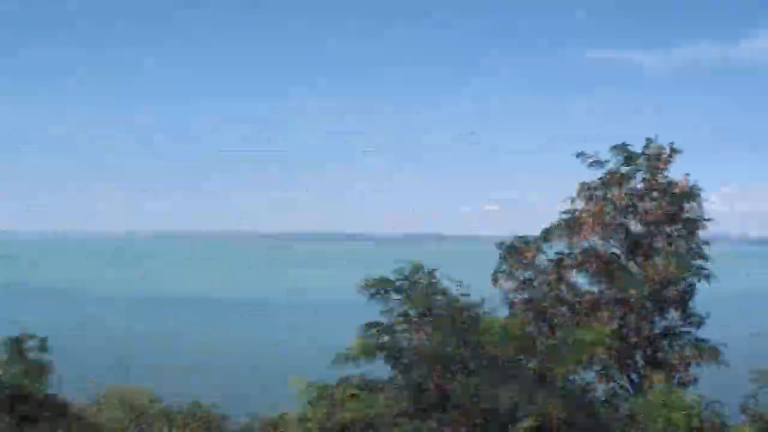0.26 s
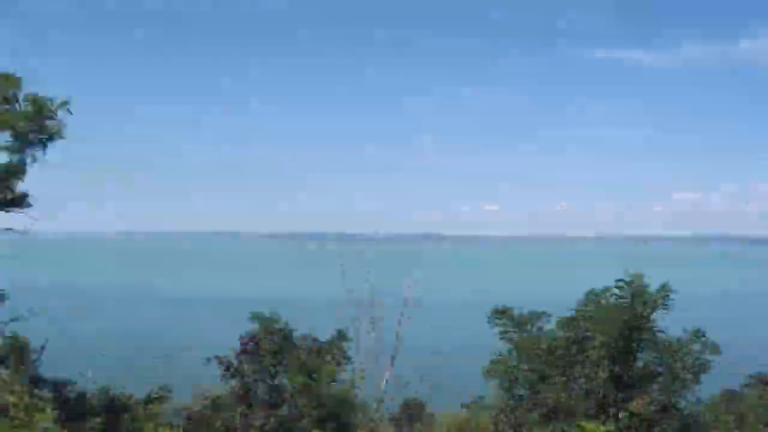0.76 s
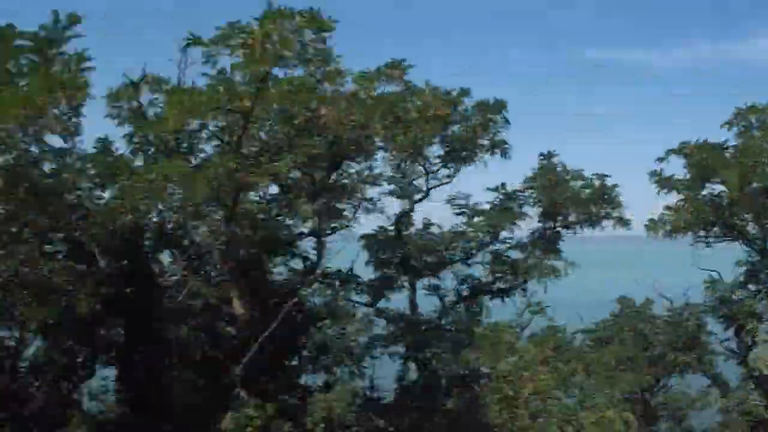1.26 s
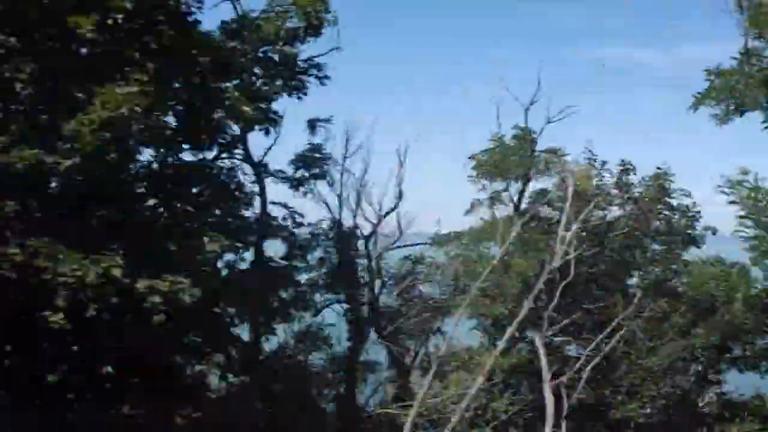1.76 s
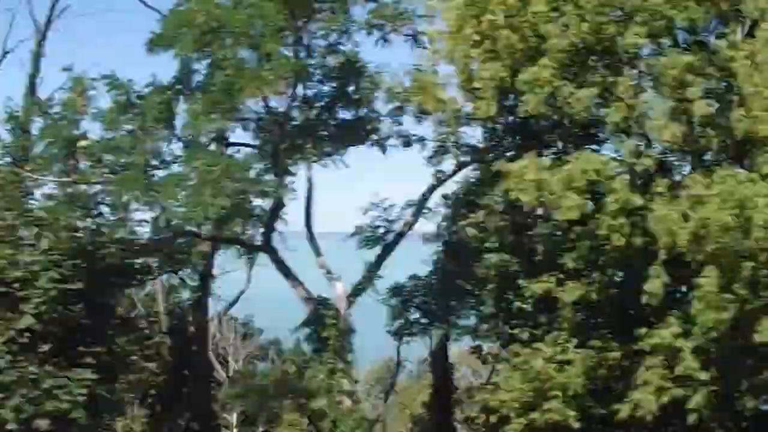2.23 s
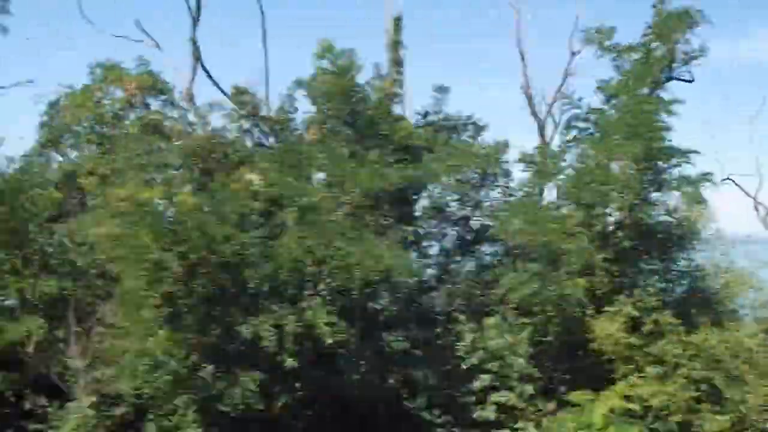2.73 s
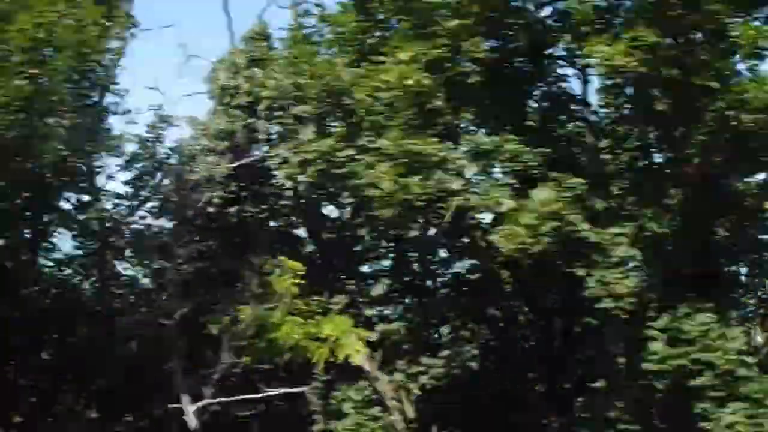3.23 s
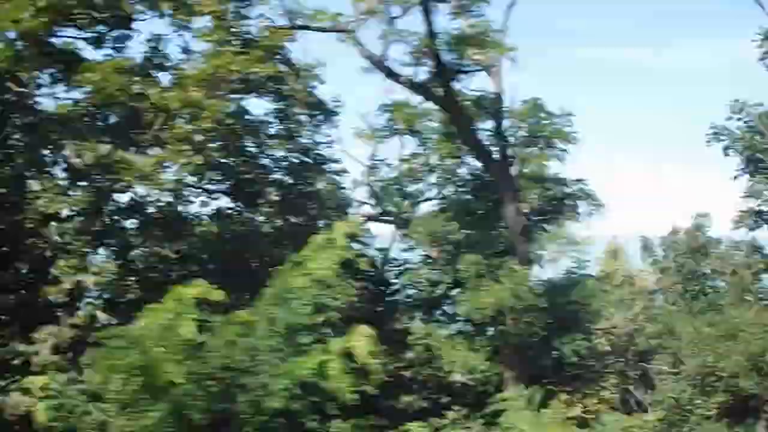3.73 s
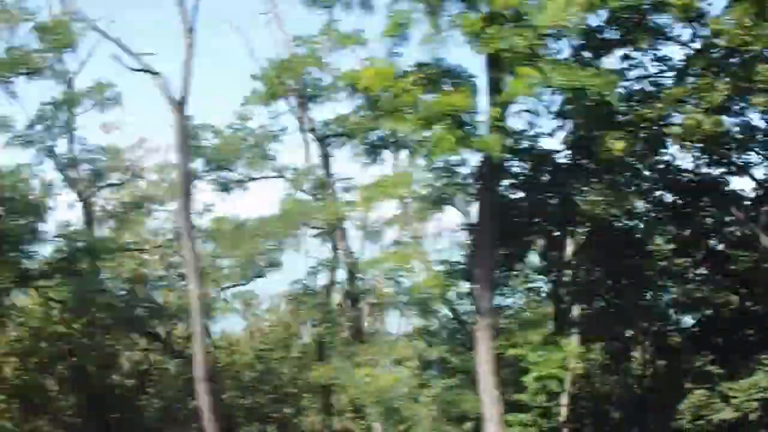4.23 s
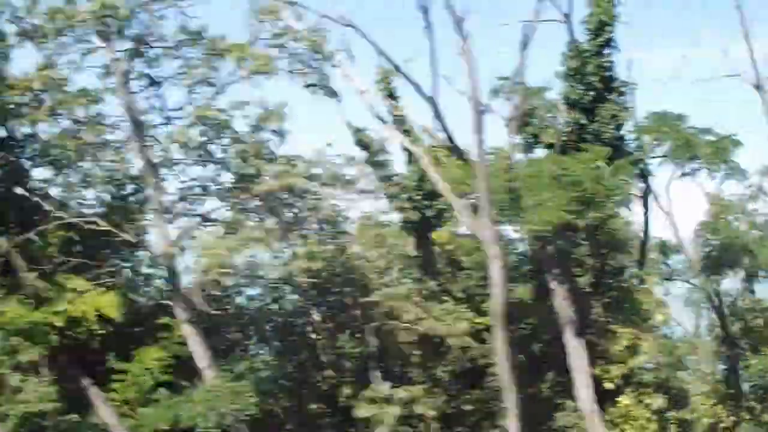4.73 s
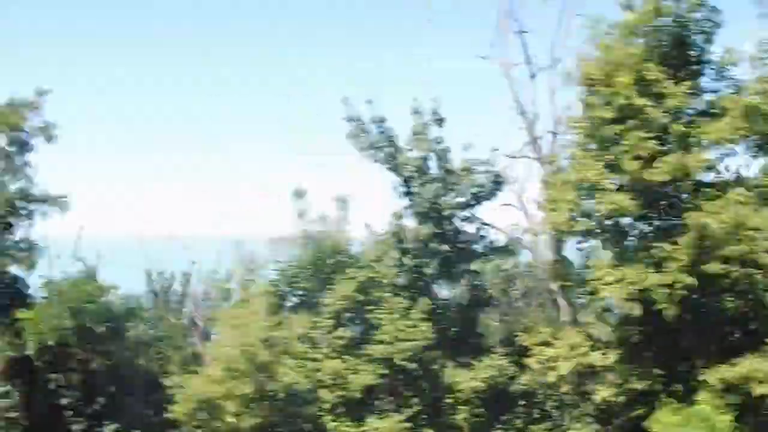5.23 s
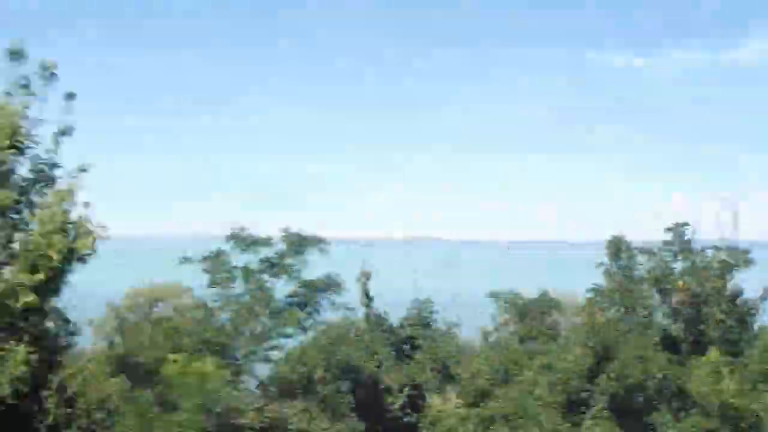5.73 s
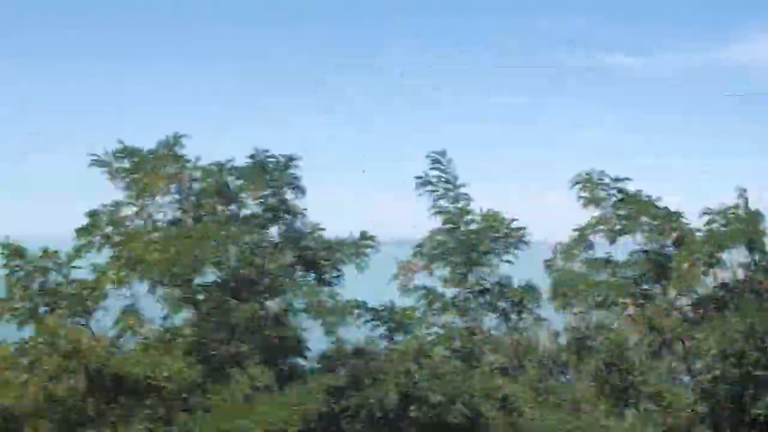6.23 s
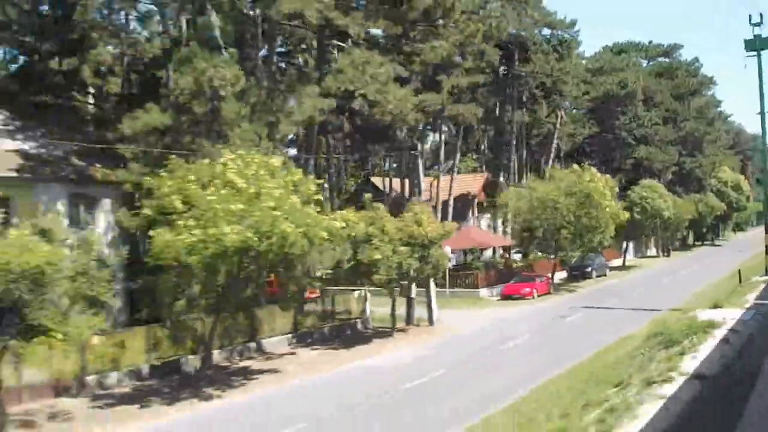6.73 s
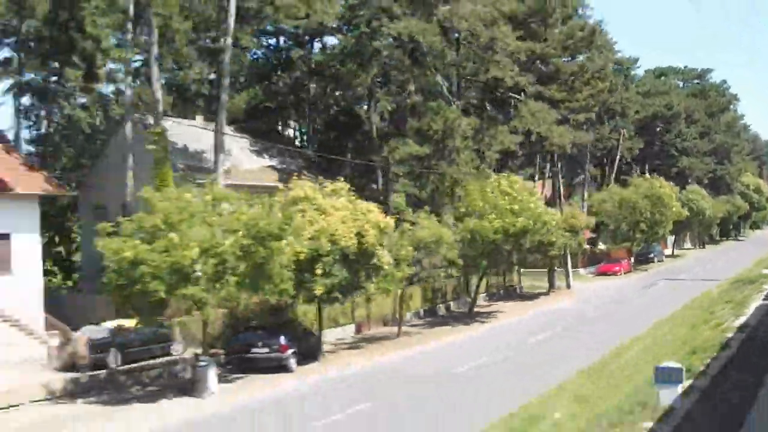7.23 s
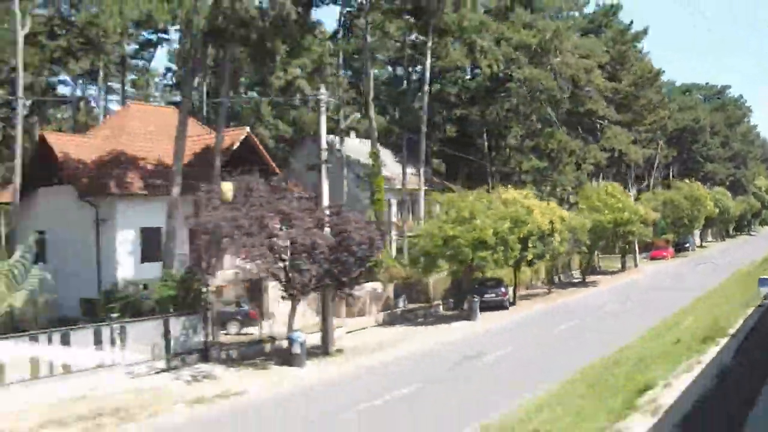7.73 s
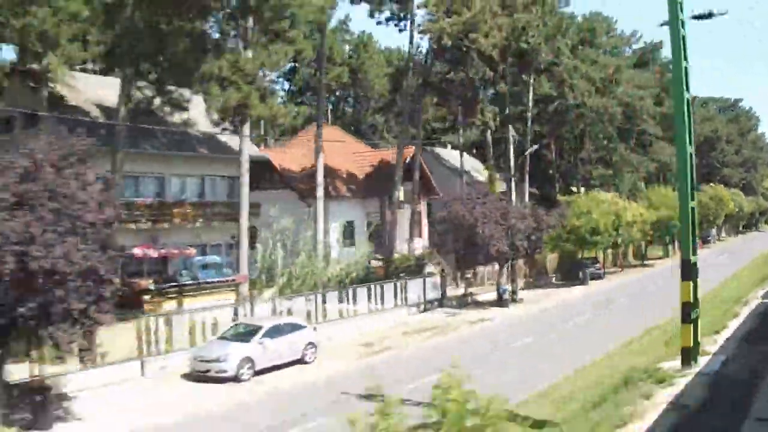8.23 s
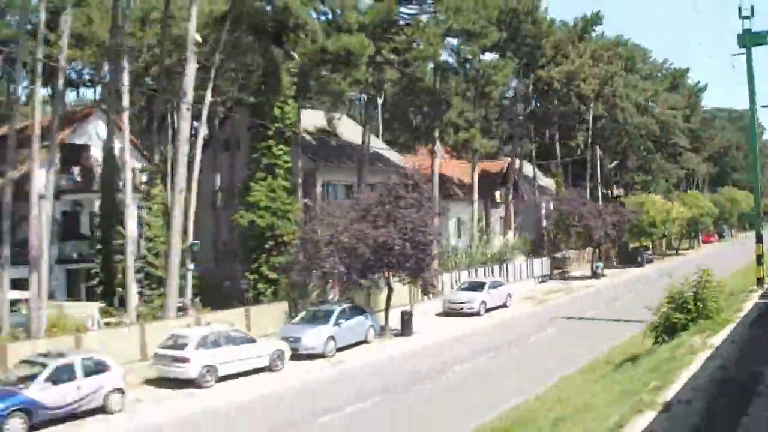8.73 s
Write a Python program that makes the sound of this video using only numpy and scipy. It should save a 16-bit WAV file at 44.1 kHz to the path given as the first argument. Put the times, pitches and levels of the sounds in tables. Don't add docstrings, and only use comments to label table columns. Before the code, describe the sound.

Heavy wind buffets a microphone at an open vehicle window, low overloaded rumble and flutter broken by sharp irregular knocks and brief hissing bursts.

```python
import sys
import numpy as np
from scipy import signal
from scipy.fft import rfft, irfft, next_fast_len
from scipy.io import wavfile
from scipy.ndimage import uniform_filter1d

SR = 44100
rng = np.random.default_rng(int(sys.argv[2]) if len(sys.argv) > 2 else 0)


def master_out(mix):
    frames = np.transpose(np.atleast_2d(mix))
    ceiling = np.clip(frames, -1, 1)
    pcm = np.round(ceiling * 32767).astype(np.int16)
    wavfile.write(sys.argv[1], SR, pcm)


def boost(x):
    u = np.asarray(x, float) / 20
    return 10 ** u


N = 396018

# (time [s], length [s], drive over the ceiling [dB], eddy frequency [Hz], port whistle [dB])
GUSTS = [(0.002, 0.027, -2, 149, -24), (0.124, 0.072, 15.5, 109, -22.5), (0.469, 0.034, 18.5, 145, -12),
         (0.822, 0.026, 28, 189.3, -12.5), (1.418, 0.076, 13.5, 170, -13.5),
         (2.062, 0.051, 33, 186.3, -10.5), (2.557, 0.045, 22, 113, -22.5),
         (2.819, 0.027, 16.5, 82.4, -15.5), (2.962, 0.012, 16.5, 147, -8), (3.004, 0.013, 25.5, 63.5, -23),
         (3.138, 0.048, 30.5, 161.3, -10.5), (3.687, 0.05, 22, 117, -27), (4.004, 0.056, 8, 186, -19.5),
         (4.284, 0.017, 27, 114.7, -7.5), (4.325, 0.045, -3, 180, -20), (4.506, 0.068, 24, 236.2, -7.5),
         (4.85, 0.065, 15, 202, -14.5), (5.389, 0.049, 22.5, 129.4, -11.5), (5.835, 0.056, 27.5, 223, -9),
         (6.652, 0.085, 23, 254, -11), (7.636, 0.042, 24.5, 488, -2.5), (7.994, 0.013, 36, 410, -32),
         (8.081, 0.046, 26.5, 479, -7.5), (8.593, 0.099, 19.5, 267, -17.5), (8.861, 0.047, 26, 380, -5.5)]
# (time [s], length [s], drive over the ceiling [dB], eddy frequency [Hz])
SURGES = [(0.015, 0.042, 1.5, 110), (0.101, 0.05, -1, 58.4), (0.508, 0.042, 8.5, 82),
          (0.575, 0.045, 12.5, 137), (0.6, 0.026, -3, 141), (0.665, 0.01, 11, 128),
          (0.862, 0.013, 13, 38.7), (1.491, 0.068, 6.5, 119), (2.873, 0.0046, 12, 45.7),
          (3.207, 0.013, 14.5, 78), (4.098, 0.0078, 21.5, 35.8), (4.379, 0.031, 22.5, 80.6),
          (4.926, 0.094, -7.5, 110), (4.991, 0.025, 3, 139), (5.049, 0.051, 15.5, 96),
          (5.149, 0.0045, 17, 77.5), (5.499, 0.0051, 23, 92), (5.913, 0.057, 17, 70.7),
          (6.291, 0.078, 20, 92), (6.73, 0.026, -2, 120), (7.685, 0.042, 11.5, 168), (8.01, 0.043, 15, 151),
          (8.138, 0.013, 21, 198), (8.167, 0.031, 7.5, 85), (8.218, 0.043, 0.5, 123),
          (8.265, 0.01, 23, 248), (8.683, 0.094, 8, 117), (8.777, 0.0069, 6, 71.0),
          (8.929, 0.11, 7.5, 65.4)]
# (time [s], peak level [dB], length [s])
SLAPS = [(0.4635, -5, 0.0024), (0.8276, -7, 0.0013), (1.43, -15, 0.0033), (2.069, -2, 0.016),
         (2.562, -6, 0.0017), (2.8215, -6.5, 0.0042), (2.967, -20, 0.0026), (3.1476, 3, 0.0025),
         (3.688, -4.5, 0.0073), (3.7376, -14.5, 0.0046), (4.0101, -5, 0.0048), (4.289, -15, 0.0085),
         (4.512, -7, 0.0077), (4.539, -13.5, 0.015), (4.852, -7, 0.0044), (5.403, 1, 0.0024),
         (5.416, -38, 0.013), (5.854, -15, 0.0052), (5.862, -12.5, 0.02), (6.3056, -8.5, 0.0079),
         (6.348, -17.5, 0.0062), (6.662, -9.5, 0.0076), (7.638, -12, 0.0084), (7.993, 4.5, 0.015),
         (8.029, -9, 0.0062), (8.085, 1, 0.028), (8.168, -21, 0.013), (8.601, 9, 0.005),
         (8.8676, 5.5, 0.011)]
# (time [s], signed height [full scale])
TICKS_FIRST = [(0.2285, 0.59), (0.255, 0.42), (0.29, 0.94), (0.294, 0.57), (0.4092, 0.47), (0.6851, 0.61),
               (0.9302, 0.37), (0.9352, 0.23), (0.972, 0.54), (1.1424, -0.81), (1.293, -0.52), (1.8425, -1),
               (1.9109, 0.53), (2.197, 0.58), (2.4304, 0.74), (2.665, 0.29), (2.7438, 0.87), (2.893, 0.58),
               (2.911, -0.4), (2.9205, -0.3), (3.1016, 0.5), (3.297, 0.43), (3.414, 0.66), (3.2524, -0.29),
               (3.4504, -0.44), (3.7806, -0.67), (3.8237, 0.97), (4.1853, 0.65), (4.47, 0.5),
               (4.7301, -0.63), (4.7918, 0.48), (5.1703, -0.077), (5.244, -0.47), (5.324, 0.48),
               (5.664, 0.96), (6.011, -0.52), (6.1906, 0.5), (6.447, 0.23), (6.489, -0.28), (6.5578, 0.6),
               (6.581, -0.27)]
TICKS_SECOND = [(6.611, 0.63), (6.7966, -0.6), (6.8477, 0.54), (6.8533, 0.3), (6.867, 0.0063),
                (6.9903, 0.4), (6.995, -0.59), (7.0938, 1), (7.158, 0.21), (7.1904, 0.63), (7.276, -0.029),
                (7.309, 0.32), (7.458, 0.25), (7.7485, -0.14), (8.0627, 0.47), (8.8456, 0.36),
                (7.223, 0.12), (7.243, 1), (7.389, 0.11), (7.88, -0.22), (7.3447, 0.49), (7.394, -0.36),
                (7.506, -0.3), (7.5446, 0.75), (7.6162, -1.1), (7.7362, -0.54), (7.7607, 0.53),
                (7.839, 0.86), (7.869, -1), (7.894, 0.17), (7.9606, -0.41), (8.051, -0.053),
                (8.2885, -0.39), (8.362, 0.58), (8.4054, -0.75), (8.8346, 0.82)]
# (time [s], level [dB])
FLOW = [(0.0, -33), (0.25, -18.5), (0.68, -12), (1.07, -23), (1.52, -7.5), (1.82, -27), (3.05, -15.5),
        (3.45, -15), (4.78, -12.5), (5.0, -12.5), (5.45, -10.5), (5.93, -13.5), (6.3, -22.5), (7.93, -14.5),
        (8.1, -18), (8.5, -20.5), (8.88, -9.5), (8.98, -4)]
# (time [s], half width [s], rumble level [dB], flutter level [dB])
PUFFS = [(0.06, 0.13, -27, -8.5), (0.302, 0.0096, -16, -12.5), (0.69, 0.094, -44, -29),
         (1.148, 0.027, -15, -27), (1.25, 0.015, -21, -41), (1.701, 0.016, -41, -18),
         (1.822, 0.088, -18, -20.5), (1.97, 0.051, -16, -22), (2.19, 0.083, -12, -21),
         (2.34, 0.02, -5, -26), (2.46, 0.05, -12.5, -26), (2.659, 0.031, -8, -44), (3.052, 0.024, -4, -9),
         (3.302, 0.012, -9, -33), (3.43, 0.061, -15, -18), (3.551, 0.01, -3.5, -20),
         (3.599, 0.021, -38, -33), (4.13, 0.014, -13.5, -19), (4.25, 0.018, -13.5, -30),
         (4.68, 0.033, -18, -29), (5.242, 0.028, -27, -12), (5.481, 0.025, -5, -6),
         (5.659, 0.027, -16, -18), (6.02, 0.094, -20, -20), (6.2, 0.046, -21, -31),
         (6.44, 0.078, -15.5, -30), (6.787, 0.019, -44, -6.5), (7.0, 0.074, -46, -20.5),
         (7.502, 0.061, -34, -13), (8.44, 0.099, -36, -21.5)]
# (time [s], depth [dB])
LULLS = [(0.26, 16), (0.8, 9), (0.91, -5), (1.05, 6), (1.2, 6), (1.33, 15), (1.62, 0.5), (1.77, 13),
         (1.93, 13), (3.52, 7), (3.65, 9), (4.2, 17), (4.61, 11), (5.56, 12), (6.269, -4), (6.4, 8),
         (2.03, 4), (2.4, 15), (7.922, 17), (3.39, 27), (3.91, 10), (4.75, 19), (5.29, 26), (5.6, 4),
         (6.134, 29), (6.53, 12), (6.95, 6), (7.43, 17), (7.81, -4), (8.54, 13)]
# (time [s], peak level [dB])
EDDIES = [(0.378, -17), (0.665, -2), (1.097, -13.5), (1.367, -22), (2.43, -9), (3.415, -41), (5.189, -12),
          (6.484, -17), (6.604, -0.5), (7.236, -11), (7.337, -4), (1.467, 10), (1.524, 22), (4.059, -31),
          (4.344, 8), (4.697, -3.5), (4.897, 21.5), (5.044, 15.5), (6.066, -8.5), (6.169, -13), (6.3, 11),
          (6.347, -4), (6.982, -24.5), (7.455, -11), (7.937, -4.5), (8.135, 0), (8.725, 14), (8.833, 3),
          (8.947, 12),
          (0.226, -23), (0.543, -13), (0.589, 5), (0.707, -15), (0.882, -34), (1.136, -23), (1.688, -19),
           (1.798, -28), (1.822, -18), (1.903, -35), (2.179, -40), (2.304, -19), (2.55, -21), (2.614, -28),
           (2.808, -13), (3.039, -9), (3.074, -12), (3.136, -21), (3.313, -16), (3.541, -23), (3.58, -9),
           (3.61, -11), (3.816, -19), (3.94, -12), (3.976, -9.5), (4.125, -20), (4.212, -23), (4.244, -28),
           (4.472, -24), (4.788, -17), (5.317, -23), (5.465, -4), (5.502, 0), (5.952, -21), (6.508, -31),
           (6.972, -14), (7.034, -16), (7.12, -14), (7.304, -21), (7.383, -20), (7.596, -7.5), (7.707, -9),
           (7.868, 0.5), (8.183, -3), (8.459, -14), (8.576, -8), (8.756, 3)]
# (frequency [Hz], density [dB per Hz])
RUMBLE = [(12, -6.5), (40, 6.5), (90, -1.5), (160, -13), (300, -86), (800, -90)]
FLUTTER = [(60, -15.5), (120, 1), (300, -7.5), (700, -17), (1500, -26.5), (3000, -28.5), (4500, -47.5),
           (6000, -100)]
# (frequency [Hz], density [dB per Hz])
HISS_FIRST = [(400, -41), (700, -17), (1500, -11), (2000, -14.5), (2800, -6.5), (3300, -0.5), (4000, -12.5),
              (5200, -32.5), (6300, -24.5), (7800, -20), (8800, -23), (10000, -33), (12000, -38),
              (16000, -66)]
HISS_SECOND = [(400, 12), (700, -1), (1500, -2), (2500, -3.5), (3500, 5), (4200, -23), (5000, -44),
               (7500, -23), (9500, -36), (12000, -44), (16000, -56)]
# (time [s], half width [s], level [dB])
HISS_SWELLS = [
    (0.03, 0.054, -17.5),
    (3.06, 0.03, -31.5),
    (5.018, 0.048, -19.5),
    (5.55, 0.077, -38.5),
    (8.14, 0.072, -65),
    (8.79, 0.067, -29.5),
]
# (lower edge [Hz], upper edge [Hz], level [dB])
SMEAR = [(1200, 2400, -21), (2400, 4500, -15), (4500, 9000, -12), (9000, 15800, -12)]
# (start [s], end [s])
SILENT_S = (6.582, 6.6005)

CEILING = 0.51
SAG_HZ, CUTOFF_HZ = 2.5, 16500
PORT_HZ, PORT_WIDTH_HZ = 2916, 1130
SURGE_WHISTLE_DB = -31.5
CALM_RUMBLE_DB, CALM_FLUTTER_DB = -3, -10
STILL_DB = -47
WAKE_RISE_S, WAKE_FULL_S = 0.013, 0.052
WAKE_RUMBLE_DB, WAKE_RUMBLE_S = -10, 0.019
WAKE_FLUTTER_DB, WAKE_FLUTTER_S = -4, 0.0098
WAKE_HISS_DB, WAKE_HISS_S = -29, 0.032
LULL_S, LULL_RUMBLE_SHARE = 0.037, 0.41
ONSET_EDDY_DB, ONSET_EDDY_PER_DRIVE = -6.5, 0.3
PEAK_EDDY_DB, PEAK_EDDY_LEAD_S = -19, 0.0045
HISS_FIRST_DB, HISS_SECOND_DB = -39.5, -36.5


def gusts():
    out = np.zeros(N)
    white = rng.standard_normal(N + SR)
    whistle = port(rng.standard_normal(N)) * boost(3.0 * drift(60))
    blows = GUSTS + [(*row, SURGE_WHISTLE_DB) for row in SURGES]
    for s, length, drive_db, eddy_hz, whistle_db in blows:
        start, size = round(s * SR), round((length + 0.11) * SR)
        t = np.arange(min(size, N - start)) / SR
        span = slice(start, start + len(t))
        piece = white[start:start + len(t) + 4000]
        band_hz = [max(18, 0.22 * eddy_hz), 0.846 * eddy_hz]
        band = signal.butter(2, band_hz, "band", fs=SR, output="sos")
        eddies = evened(signal.sosfilt(band, piece)[4000:], 0.91 / eddy_hz, 0.76)
        after = np.maximum(t - length, 0)
        swell = np.minimum(t / 0.0044, 1) * np.exp(-after / 0.0054)
        linger = np.minimum(t / 0.003, 1) * np.exp(-after / 0.008)
        fade = boost(-6.0 * t / length)
        push = CEILING * boost(drive_db - 3.5) * fade * eddies
        out[span] += swell * push + linger * boost(whistle_db + 4.0) * whistle[span]
    return out


def port(x):
    r = np.exp(-np.pi * PORT_WIDTH_HZ / SR)
    once = ([1, 0.071, -0.95], [1, -2 * r * np.cos(2 * np.pi * PORT_HZ / SR), r * r])
    return rms_one(signal.lfilter(*once, signal.lfilter(*once, x)))


def slapped(air):
    share, level = np.zeros(N), np.zeros(N)
    t = np.arange(SR // 10) / SR
    for s, peak_db, length in SLAPS:
        start = round(s * SR)
        shape = np.exp(-(t / length) ** 2)[:N - start]
        share[start:start + len(t)] = shape
        level[start:start + len(t)] = shape * boost(peak_db + 18.0)
    white = rng.standard_normal((2, N))
    jet = rms_one(signal.lfilter(*signal.butter(2, [120, 600], "band", fs=SR), white[0]))
    return air * (1 - 0.6 * share) + level * (jet + boost(-10.0) * port(white[1]))


def peaked(air):
    s, heights = np.transpose(TICKS_FIRST + TICKS_SECOND)
    at = (s * SR).astype(int)
    t = np.arange(-SR // 50, SR // 50) / SR
    cusp = np.exp(-(np.abs(t) / np.where(t < 0, 0.003, 0.004)) ** 0.96)
    pull, steps = np.zeros(N), np.full(N, 1e-18)
    pull[at] = np.clip(heights, -0.47, 0.47) - air[at]
    steps[at] = -heights * boost(-13.5)
    recovery = signal.lfilter([1], [1, -np.exp(-1 / (0.0013 * SR))], steps)
    return air + signal.fftconvolve(pull, cusp, "same") + recovery


def eddy_lumps():
    eddies = EDDIES
    eddies = eddies + [(row[0], ONSET_EDDY_DB + ONSET_EDDY_PER_DRIVE * row[2]) for row in GUSTS]
    eddies += [(s - PEAK_EDDY_LEAD_S, PEAK_EDDY_DB) for s, height in TICKS_FIRST + TICKS_SECOND]
    kicks = np.full(N, 1e-18)
    kicks[[round(s * SR) for s, db in eddies]] = boost(np.array(eddies)[:, 1] - 7.5)
    rise, fall = np.exp(-1 / (0.00057 * SR)), np.exp(-1 / (0.011 * SR))
    return signal.lfilter([1 - rise], [1, -rise], signal.lfilter([1], [1, -fall], kicks))


def turbulence():
    s, half_s, puff_rumble_db, puff_flutter_db = np.transpose(PUFFS)
    lull_s, depth_db = np.transpose(LULLS)
    calm = boost(in_time(FLOW)[0])
    lull = boost(-bumps(lull_s, LULL_S, depth_db))
    rumble_level = calm * boost(CALM_RUMBLE_DB) + bumps(s, half_s, boost(puff_rumble_db))
    rumble_level += boost(WAKE_RUMBLE_DB) * wake(WAKE_RUMBLE_S)
    flutter_level = calm * boost(CALM_FLUTTER_DB) + bumps(s, half_s, boost(puff_flutter_db))
    flutter_level += boost(WAKE_FLUTTER_DB) * wake(WAKE_FLUTTER_S)
    rumble = lull ** LULL_RUMBLE_SHARE * rumble_level * evened(coloured(RUMBLE), 0.083, 0.51)
    flutter_level = lull * flutter_level * boost(-5.5 + 5.88 * drift(47.6))
    flutter_level += eddy_lumps() + boost(STILL_DB)
    return rumble + flutter_level * evened(coloured(FLUTTER), 0.0212, 1.0)


def wake(release_s):
    t = np.arange(0, N, 64)[:, None] / SR
    s, length = np.transpose([row[:2] for row in GUSTS + SURGES])
    shape = np.clip((t - s) / WAKE_RISE_S, 0, 1) * np.exp(-np.maximum(t - s - length, 0) / release_s)
    shape *= np.minimum(length / WAKE_FULL_S, 1)
    return np.interp(np.arange(N) / SR, t[:, 0], shape.max(axis=1))


def hiss():
    second = np.arange(N) / SR > SILENT_S[1]
    s, half_s, swell_db = np.transpose(HISS_SWELLS)
    level = boost(np.where(second, HISS_SECOND_DB, HISS_FIRST_DB)) + bumps(s, half_s, boost(swell_db))
    level += boost(WAKE_HISS_DB) * wake(WAKE_HISS_S)
    noise = np.where(second, coloured(HISS_SECOND), coloured(HISS_FIRST))
    peaks = np.zeros(N)
    peaks[(np.array(TICKS_FIRST + TICKS_SECOND)[:, 0] * SR).astype(int)] = 1
    noise *= 1 + boost(11.0) * signal.fftconvolve(peaks, np.hanning(int(0.0016 * SR)), "same")
    return level * boost(2.5 * drift(25)) * noise


def rms_one(x):
    return x / np.sqrt(np.mean(x ** 2) + 1e-20)


def in_time(rows):
    s, *columns = np.transpose(rows)
    return [np.interp(np.arange(N) / SR, s, c) for c in columns]


def bumps(s, half_s, height):
    t = np.arange(0, N, 64) / SR
    bells = np.exp(-((t[:, None] - s) / half_s) ** 2) @ (height * np.ones(len(s)))
    return np.interp(np.arange(N) / SR, t, bells)


def drift(rate_hz):
    r = np.exp(-2 * np.pi * rate_hz / SR)
    return rms_one(signal.lfilter([1], [1, -2 * r, r * r], rng.standard_normal(N + SR))[SR:])


def coloured(spectrum):
    hz, level_db = np.transpose(spectrum)
    size = next_fast_len(N)
    grid_hz = np.maximum(np.fft.rfftfreq(size, 1 / SR), 1)
    gain = boost(np.interp(np.log(grid_hz), np.log(hz), level_db, left=-90, right=-130))
    return rms_one(irfft(rfft(rng.standard_normal(size)) * gain, size)[:N])


def evened(x, span_s, share):
    power = uniform_filter1d(x ** 2, int(span_s * SR)) + 0.0024
    return rms_one(x / power ** (share / 2))


def scene():
    air = peaked(slapped(turbulence() + gusts())) + hiss()
    return np.array([air, air])


def smeared(x):
    out = x.copy()
    fade = np.exp(-1 / (0.004 * SR))
    for low_hz, high_hz, level_db in SMEAR:
        band = signal.butter(4, [low_hz, high_hz], "band", fs=SR, output="sos")
        power = uniform_filter1d(signal.sosfilt(band, x) ** 2, int(0.002 * SR))
        power += boost(-8.0) * signal.lfilter([1 - fade], [1, -fade], power)
        noise = rms_one(signal.sosfilt(band, rng.standard_normal(x.shape)))
        out += boost(level_db) * np.sqrt(np.maximum(power, 0)) * noise
    return out


def low_pass(x):
    return signal.sosfilt(signal.butter(12, 16540, fs=SR, output="sos"), x)


def record(dry):
    x = np.clip(dry, -CEILING, CEILING) * boost(-0.82)
    x = signal.lfilter(*signal.butter(1, SAG_HZ, "high", fs=SR), x)
    x = np.clip(x, -CEILING, CEILING)
    x = signal.lfilter(*signal.butter(1, 18000, fs=SR), x)
    left, right = smeared(np.array([np.roll(x[0], shift=1), x[1]]))
    treble = signal.butter(1, 350, "high", fs=SR, output="sos")
    side = signal.sosfiltfilt(treble, left - right) / 2
    x = (left + right) / 2 + side * [[1], [-1]]
    x = signal.sosfilt(signal.cheby2(8, 30, CUTOFF_HZ, fs=SR, output="sos"), x)
    t = np.arange(N) / SR
    x = x * ((t < SILENT_S[0]) | (t > SILENT_S[1]))
    return low_pass(x)


dry = scene()
out = record(dry)
master_out(out)
```